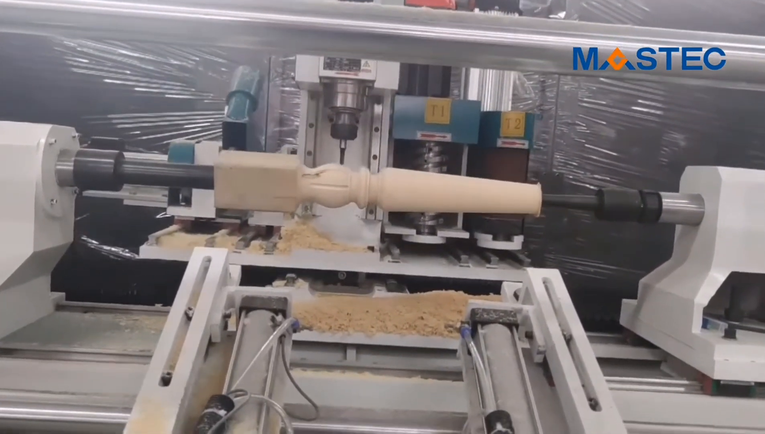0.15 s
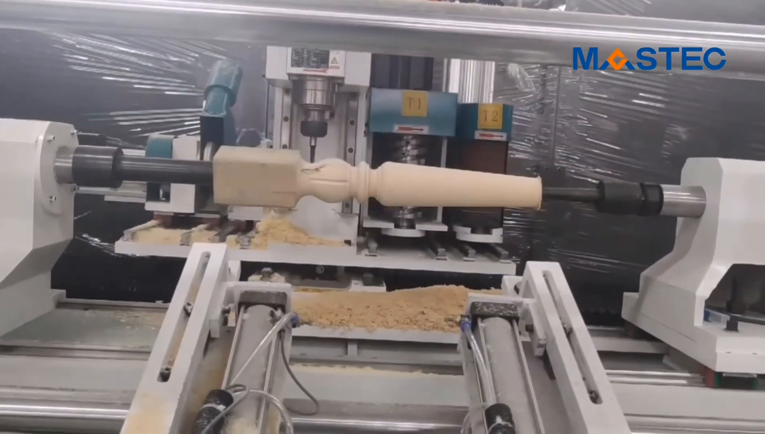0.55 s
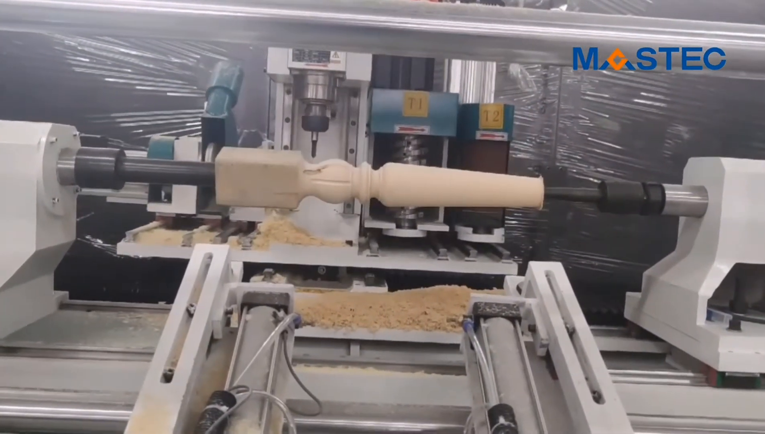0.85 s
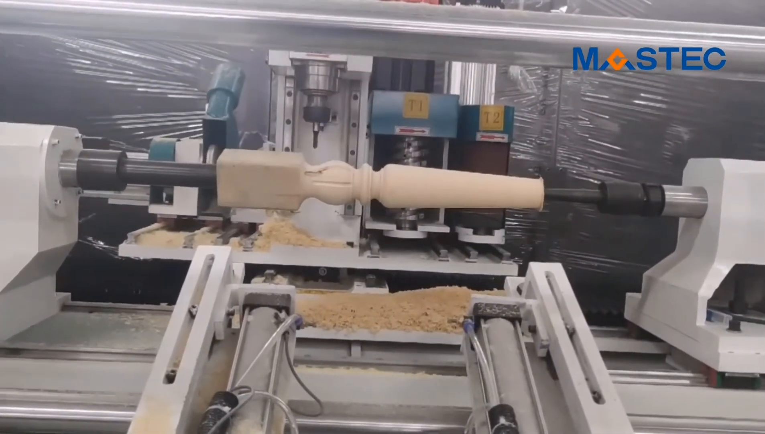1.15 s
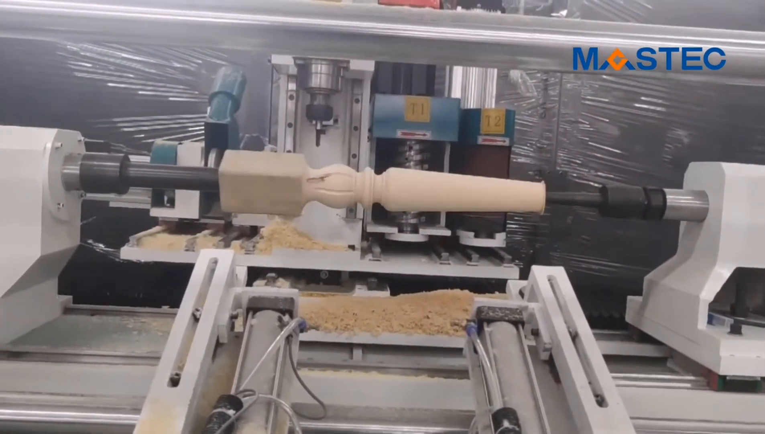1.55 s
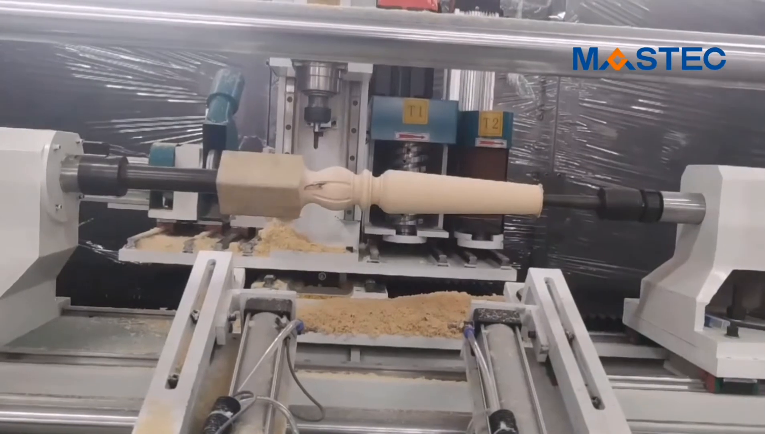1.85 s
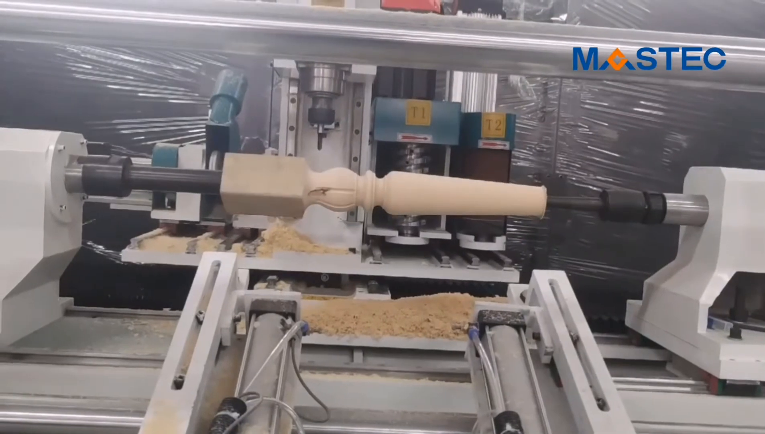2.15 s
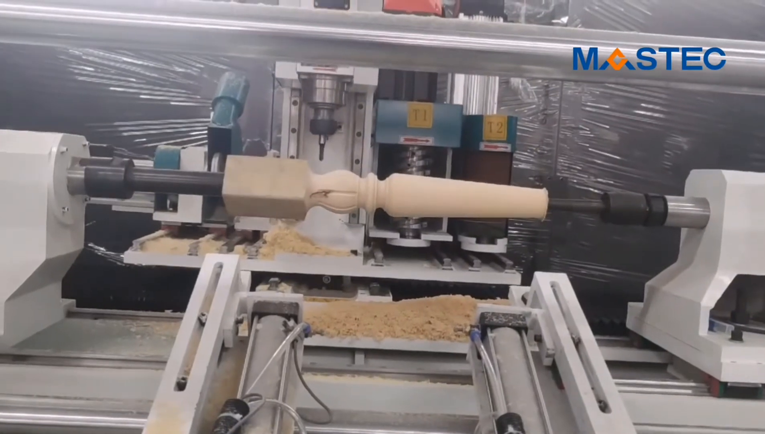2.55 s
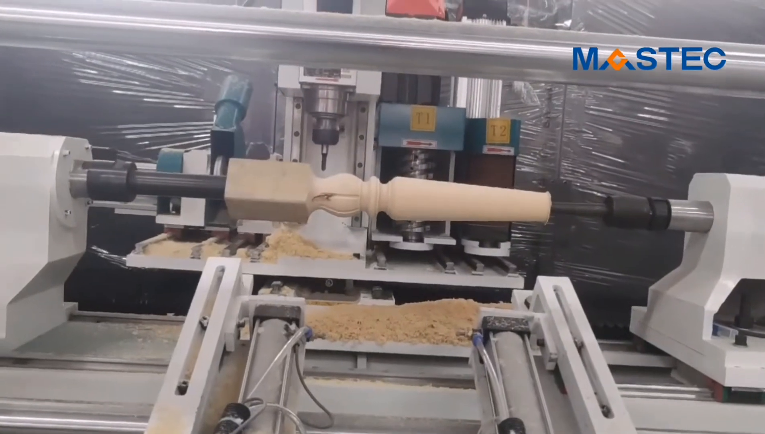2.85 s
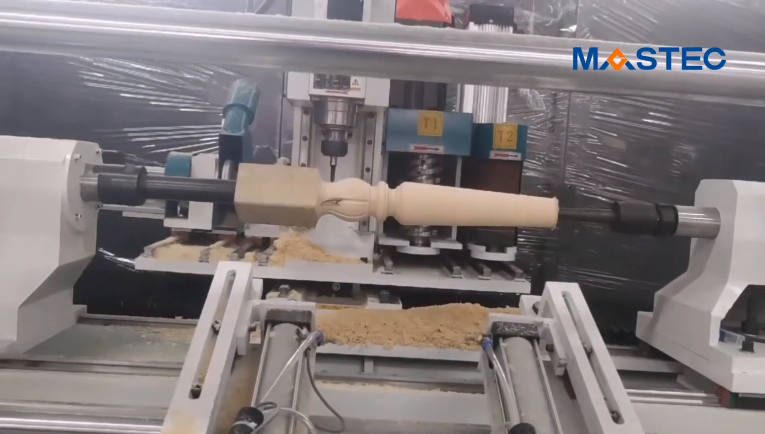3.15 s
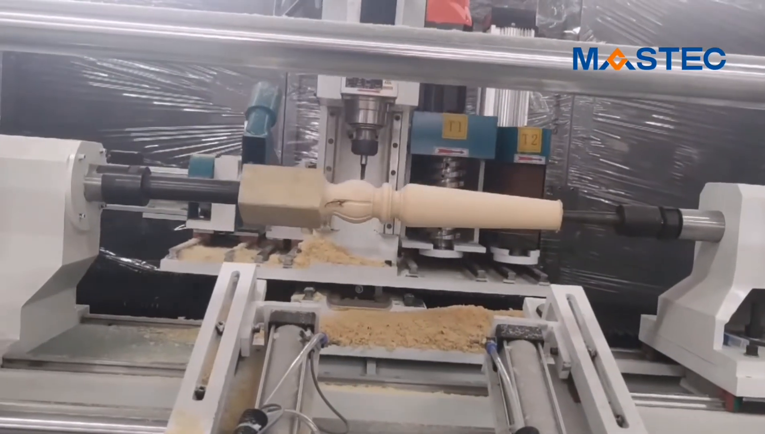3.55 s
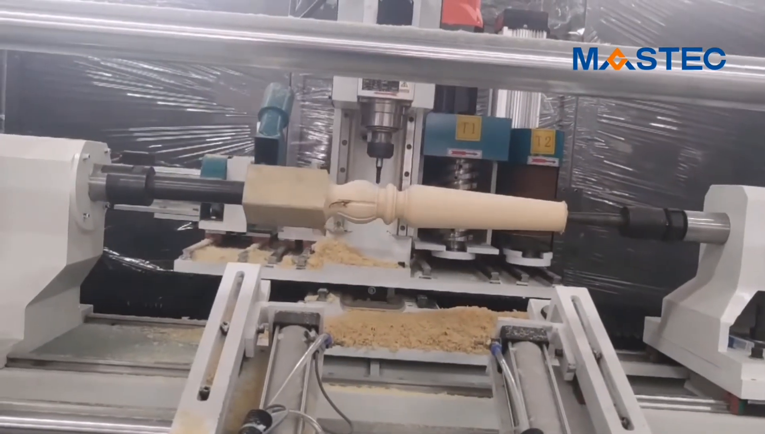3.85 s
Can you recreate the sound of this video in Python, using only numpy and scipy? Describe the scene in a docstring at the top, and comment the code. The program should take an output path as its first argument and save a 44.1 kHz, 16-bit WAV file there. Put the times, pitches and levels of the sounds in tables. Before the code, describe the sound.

Router spindle whirring at constant speed, broad hissing air, faint hum and whine, chips ticking lightly.

```python
"""Inside a sheet-metal cabinet, a router spindle idles at high speed on a wood lathe, close to two microphone
ports. Its fan air is broadband noise through the resonances of ducts and guards; its shaft is a hum and a whine
of sines. Soft knocks and wood chips are noise bursts through the same resonances; a slide squeaks in stacks of
overtones. The ports hear mostly unrelated air, each in its own colour, and the treble ends in a steep cutoff
near 14.5 kHz."""
import sys
import numpy as np
from scipy import signal
from scipy.fft import rfft, irfft
from scipy.io import wavfile
from scipy.ndimage import uniform_filter1d

SR = 44100
rng = np.random.default_rng(int(sys.argv[2]) if len(sys.argv) > 2 else 0)


def decibels_to_gain(level_db):
    """Convert a level in decibels to a linear amplitude gain (20 dB per decade)."""
    exponent = np.asarray(level_db, float) / 20
    return 10 ** exponent


def store_pcm(level_fs):
    """Save levels as 16-bit WAV."""
    pcm = np.round(np.clip(level_fs, -1, 1) * 32767).astype(np.int16)
    wavfile.write(sys.argv[1], SR, np.atleast_2d(pcm).T)


N = 176400  # samples, 4 s


def curve(table, col):
    """Piecewise-linear envelope: a table column joined by straight lines in time."""
    a = np.array(table)
    return np.interp(np.arange(N) / SR, a[:, 0], a[:, col])


def colour(x, table):
    """Linear filtering: gains at (frequency [Hz], gain [dB]) points, joined along log frequency."""
    a = np.array(table)
    f = np.maximum(np.arange(N // 2 + 1) * SR / N, 1)
    gain_db = np.interp(np.log(f), np.log(a[:, 0]), a[:, 1])
    return irfft(rfft(x) * decibels_to_gain(gain_db), N)


def ring(x, hz, width_hz):
    """Resonance: two equal second-order peaks in series, gain 1 at the centre."""
    b, a = signal.iirpeak(hz, hz / width_hz, SR)
    return signal.lfilter(b, a, signal.lfilter(b, a, x))


def butter(x, order, hz, kind="low"):
    """Butterworth filtering: a maximally flat passband, run forward in time."""
    return signal.sosfilt(signal.butter(order, hz, kind, fs=SR, output="sos"), x)


def walk(rate_hz):
    """Slow random modulation: levels held 1 / rate s and smoothed twice; spread near 1."""
    k = int(SR / rate_hz)
    held = np.repeat(rng.standard_normal(N // k + 1), k)
    return 1.53 * uniform_filter1d(uniform_filter1d(held, k), k)[:N]


def unit(x):
    """Normalisation of power: scale to rms 1."""
    return x / np.sqrt(np.mean(x ** 2))


def sides(left_db, right_db):
    """Interaural-style level difference: a column of left and right levels."""
    return np.array([[left_db], [right_db]])


# resonances of ducts and guards: (frequency [Hz], width of each of two passes [Hz],
# left gain [dB], right gain [dB]), gains relative to the flat noise
DUCT_MODES = [(495, 173, 4, 4), (752.5, 148, 9, 7.5), (938, 62, 1, 9.5), (1329, 142, 7, 8),
              (1536, 110, 2.5, 0.5), (1669, 120, 5.5, 9), (1780, 46, 13.5, 3.5), (1798, 117, 12, 8),
              (2154, 100, 5, 6.5), (2400, 66, 11, 10), (2456, 200, 8, 7), (2487, 70, 11.5, 10.5),
              (3008, 100, 9, 4.5), (3147, 170, 7.5, 6), (3390, 130, 0.5, 2.5), (3682, 86, 7, 0.5),
              (4082, 200, 4, -10), (4560, 300, 2, 2.5), (5280, 170, -5, -4), (5823, 220, 2.5, 0)]
DUCT_FLICKER_HZ = 30.08


def ducted(flicker_db):
    """Modal resonance: noise at each port, flat plus the duct modes, each mode flickering alone."""
    air, *drives = rng.standard_normal((3, 2, N))
    for k, (hz, width_hz, left_db, right_db) in enumerate(DUCT_MODES):
        level_db = sides(left_db, right_db) + flicker_db * walk(DUCT_FLICKER_HZ)
        air = air + decibels_to_gain(level_db) * ring(drives[k % 2], hz, width_hz)
    return air


def patchy(x, patch_db):
    """Time-frequency modulation: the level flickers in small patches of time and pitch."""
    z = signal.stft(x, nperseg=1024)[2]
    field = uniform_filter1d(rng.standard_normal(z.shape), size=8, axis=1)
    field = uniform_filter1d(field, size=3, axis=2)
    return signal.istft(z * decibels_to_gain(patch_db * unit(field)), nperseg=1024)[1][:, :N]


# colour of each channel, ending in a steep treble cutoff near 14.5 kHz: (frequency [Hz], relative gain [dB])
LEFT_PORT = [(25, -39), (60, -28), (100, -16), (160, -14.5), (260, -12), (370, -12.5), (600, -5),
             (1100, -5), (1600, -4.5), (2000, -6.5), (3400, -0.5), (5500, -1.5), (6300, -8), (7300, -17),
             (7900, -33), (8300, -38), (8700, -28), (9200, -18), (10500, -13), (11500, -24), (13500, -13.5),
             (14450, -18), (14600, -70)]
RIGHT_PORT = [(25, -38), (60, -35), (100, -20), (160, -21.5), (260, -7.5), (370, -10), (600, -4),
              (1100, -5), (1600, -5), (2000, -7), (3400, -4), (5500, -7.5), (6300, -10.5), (7300, -5),
              (7900, 2), (8400, 4), (9200, -2), (10500, -6), (11300, -8.5), (11900, -6.5), (13000, -10.5),
              (14450, -29), (14600, -70)]


def ports(x):
    """Frequency response: each channel is given its spectral colour and a steep treble cutoff near 14.5 kHz;
    the pair is then scaled to rms 1."""
    return unit(np.array([colour(x[0], LEFT_PORT), colour(x[1], RIGHT_PORT)]))


BASS_HZ, BASS_FLICKER_DB = 215, 3
BASS_SHARED = 0.085  # amplitude of the other port's bass in each port
TREBLE_HZ, TREBLE_FLICKER_DB, PATCH_DB = 6200, 0.4, 1.5
SHARED_DB, SHARED_HZ, OWN_DB, OWN_HZ = 0.5, 25, 0.5, 22  # flutter of the middle band
# course of the bass, used about its mean: (time [s], level [dB])
BASS_COURSE = [(0, -60.5), (.4, -53), (.65, -60.5), (.9, -56.5), (1.2, -57.5), (1.7, -58.5), (1.95, -65),
               (2.08, -66), (2.13, -46), (2.25, -53), (2.8, -59), (2.95, -55), (3.3, -57.5), (3.42, -57),
               (3.6, -57), (4, -54)]
# swell of the treble hiss: (time [s], gain [dB])
TREBLE_SWELL = [(0, 0), (3.35, -1), (3.53, 0.5), (3.7, 0.5), (4, 0)]
# loudness of the whole rush: (time [s], level [dB])
RUSH_LEVEL = [(0, -21.5), (.5, -21), (1.0, -21), (1.25, -21.5), (1.4, -21), (2.0, -21.5), (2.4, -21),
              (3.0, -21), (3.85, -21.5), (4, -21.5)]


def rush():
    """Turbulent flow noise: fan air in three bands whose levels fluctuate apart, under one loudness."""
    air = ducted(flicker_db=1.5)
    # run both ways in time, so the bands stay in phase and add up again
    low = signal.sosfiltfilt(signal.butter(4, BASS_HZ, fs=SR, output="sos"), air)
    high = signal.sosfiltfilt(signal.butter(4, TREBLE_HZ, "high", fs=SR, output="sos"), air)
    middle = air - low - high

    bass_db = curve(BASS_COURSE, 1)
    bass_flicker = 0.75 * walk(18) + 0.74 * np.array([walk(13), walk(15)])  # shared + own
    heave = decibels_to_gain(bass_db - bass_db.mean() + BASS_FLICKER_DB * bass_flicker)
    flutter = decibels_to_gain(SHARED_DB * walk(SHARED_HZ) + OWN_DB * np.array([walk(OWN_HZ), walk(OWN_HZ)]))
    swell = decibels_to_gain(curve(TREBLE_SWELL, 1) + TREBLE_FLICKER_DB * np.array([walk(7.45), walk(12)]))

    bass = (low + BASS_SHARED * low[::-1]) * heave
    hiss = patchy(high, PATCH_DB) * swell
    return ports(bass + middle * flutter + hiss) * decibels_to_gain(curve(RUSH_LEVEL, 1))


SHAFT_HZ, SHAFT_WOBBLE = 299.6, 0.00016  # mean rotation, wobble as a fraction of it
HUM_WAVER_DB, WHINE_WAVER_DB = 2.8, 2
WHINE_ORDER, WHINE_PAN_DB = 16, 7  # multiple of the rotation; left over right
# hum: (order, left base level [dB], right base level [dB], phase lag of the right [turns])
HUM_ORDERS = [(1, -48, -49.5, 0.1), (2, -47, -55.5, 0.12)]
# slow gain added to the hum: (time [s], first order [dB], second order [dB])
HUM_COURSE = [(0, 6, -5), (.09, -5, -4), (.2, 6, 10.5), (.38, 0, 3), (.5, 1, -3), (.8, -0.5, -6),
              (1.2, 2, -5), (1.6, 1.5, 5), (2.0, 3.5, -2), (2.25, 2.5, -7), (2.6, 0, -3), (3.0, -0.5, -2),
              (3.3, -1.5, -5), (3.42, 1, 6.5), (3.7, -7, 6), (3.85, 1.5, -3), (4, -3, 2)]
# mean level of the whine between the ports: (time [s], level [dB])
WHINE_LEVEL = [(0, -47), (.25, -42), (.6, -44), (1.1, -48), (1.45, -41), (1.9, -43), (2.2, -39), (2.5, -44),
               (2.8, -49), (3.4, -46), (4, -49)]


def shaft():
    """Rotational harmonics: a wavering hum on the first orders and a thin whine on a high one."""
    turns = np.cumsum(SHAFT_HZ * (1 + SHAFT_WOBBLE * walk(3.2))) / SR
    hum = 0
    for order, left_db, right_db, lag in HUM_ORDERS:
        order = round(order)
        waver_db = HUM_WAVER_DB * np.array([walk(7.7), walk(7.33)])
        level_db = sides(left_db, right_db) + curve(HUM_COURSE, order) + waver_db
        tone = np.sin(2 * np.pi * (order * turns - sides(0, lag)))
        hum = hum + np.sqrt(2) * decibels_to_gain(level_db) * tone  # sqrt(2): levels are rms
    pan = decibels_to_gain(sides(0.5, -0.5) * WHINE_PAN_DB + WHINE_WAVER_DB * walk(8.6))
    tone = np.sin(2 * np.pi * WHINE_ORDER * turns)
    return hum + np.sqrt(2) * pan * decibels_to_gain(curve(WHINE_LEVEL, 1)) * tone


KNOCK_ATTACK_S = 0.0043  # time constant
# soft knocks: (time [s], drive level [dB], time before decay [s], decay time constant [s])
KNOCK_HITS = [(0.399, -17, 0, 0.0082), (.9, -27, 0, .012), (1.46, -21, 0.0043, 0.0086),
              (1.6, -16, 0.0017, 0.01), (2.104, -21.5, 0.045, .06), (2.3, -16, 0, 0.0072),
              (2.332, -16, 0, .008), (3.04, -16.5, 0, 0.014), (3.189, -16, 0.003, .01),
              (3.235, -13.5, 0.00074, 0.008), (3.75, -18.5, 0, 0.018)]


def knocks():
    """Impulsive excitation: envelope of soft knocks with a quick rise, a hold and an exponential decay."""
    t, env = np.arange(N) / SR, 0
    for start, db, hold, decay in KNOCK_HITS:
        u = np.maximum(t - start, 0)
        rise = 1 - np.exp(-u / KNOCK_ATTACK_S)
        env = env + decibels_to_gain(db) * rise * np.exp(-np.maximum(u - hold, 0) / decay)
    return env


# CHIP_DB is the weakest drive; the scatter is the mean excess over it
CHIPS_PER_S, CHIP_DB, CHIP_SCATTER_DB, CHIP_DECAY_S = 70, -33, 1.5, 0.005


def chips():
    """Poisson impacts: envelope of wood chips that rattle on the guards at random moments."""
    happens = rng.random(N) < CHIPS_PER_S / SR
    hits = happens * decibels_to_gain(CHIP_DB + CHIP_SCATTER_DB * rng.exponential(size=N))
    return signal.lfilter([1], [1, -np.exp(-1 / (CHIP_DECAY_S * SR))], hits)


def guards():
    """Forced resonance: knocks and chips drive dull noise through the duct and guard modes."""
    body = signal.sosfilt(signal.butter(4, 6700, fs=SR, output="sos"), ducted(flicker_db=0))
    struck = (knocks() + chips()) * ports(body)
    return signal.sosfilt(signal.butter(2, 120, "high", fs=SR, output="sos"), struck)


SQUEAK_LEAD_S = 0.009  # earlier start of each next multiple
SQUEAK_JITTER, SQUEAK_ROUGH_DB = 0.0012, 1.5  # spread of pitch as a fraction, and of level
# slide squeaks: (start of the 8th multiple [s], length [s], level [dB], fundamental [Hz],
# tilt [dB per multiple above the 8th])
SQUEAK_EVENTS = [(.138, .05, -29.5, 585, -3.5), (.25, .09, -40, 590, 0), (3.485, .15, -39.5, 592, 1)]
# overtones of a squeak: (multiple of the fundamental, left gain [dB], right gain [dB])
SQUEAK_OVERTONES = [(8, 4, -3), (9, 0, -6), (10, -7, -9), (12, -14, -4), (13, -20, 0), (14, -24, 4)]


def squeaks():
    """Harmonic series: short rough whistles of a slide swell and fade, the high overtones first."""
    t, out = np.arange(N) / SR, 0
    clock = np.cumsum(1 + SQUEAK_JITTER * walk(80)) / SR  # uneven time makes the pitch jitter
    for k, left_db, right_db in SQUEAK_OVERTONES:
        k = round(k)
        rough = decibels_to_gain(sides(left_db, right_db) + SQUEAK_ROUGH_DB * walk(60))
        for start, length, db, hz, tilt_db in SQUEAK_EVENTS:
            progress = (t - start + SQUEAK_LEAD_S * (k - 8)) / length
            env = np.sin(np.pi * np.clip(progress, 0, 1))
            level = decibels_to_gain(db + tilt_db * (k - 8))
            out = out + np.sqrt(2) * env * rough * level * np.sin(2 * np.pi * k * hz * clock)
    return out


def scene():
    """Linear superposition: all sources add at the two ports."""
    return rush() + shaft() + guards() + squeaks()


def low_pass(x):
    """Removes everything above the highest recorded frequency."""
    return signal.sosfilt(signal.butter(12, 14550, fs=SR, output="sos"), x)


def record(dry):
    """Signal chain: the finished mix passes through the last stage of the phone."""
    return low_pass(dry)


dry = scene()
out = record(dry)
store_pcm(out)
```